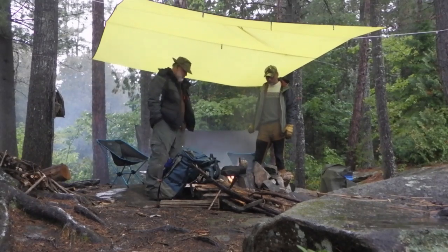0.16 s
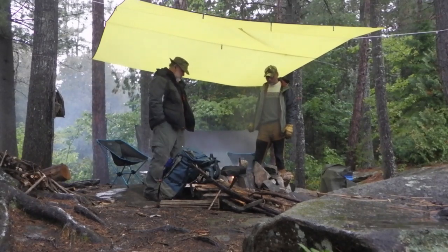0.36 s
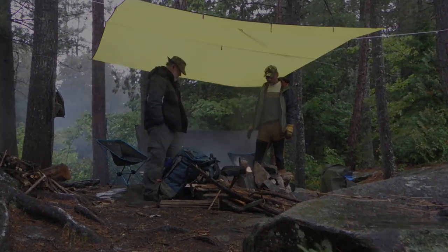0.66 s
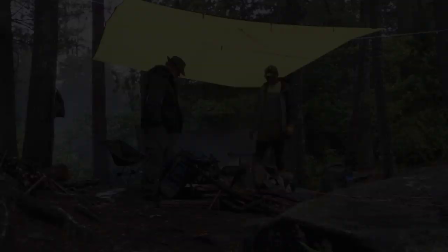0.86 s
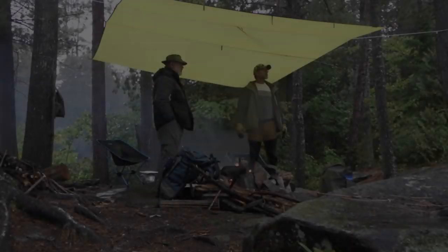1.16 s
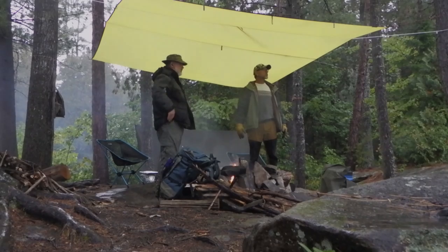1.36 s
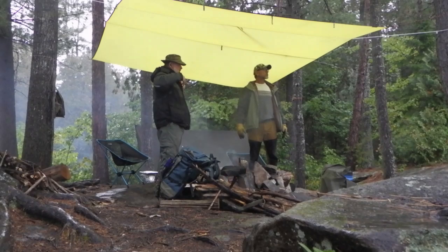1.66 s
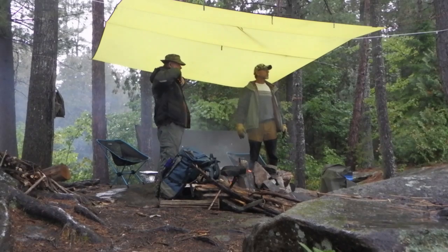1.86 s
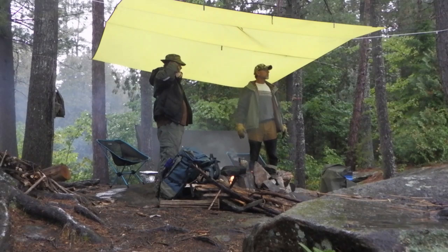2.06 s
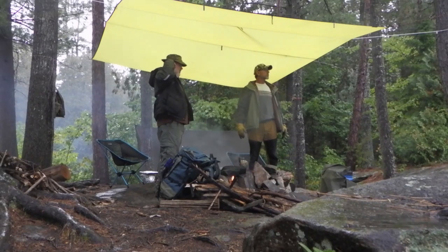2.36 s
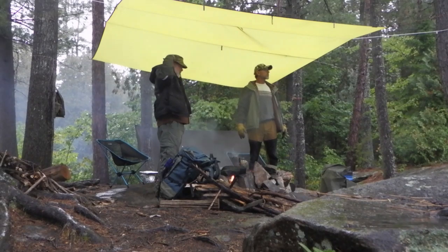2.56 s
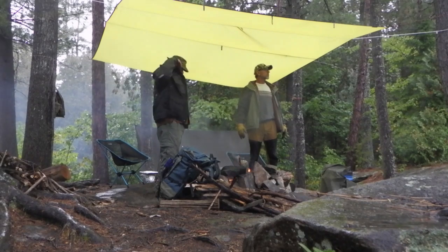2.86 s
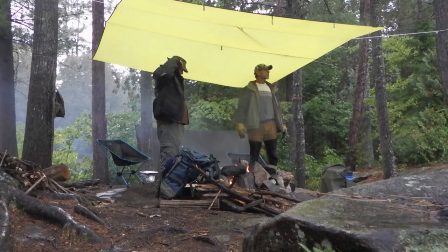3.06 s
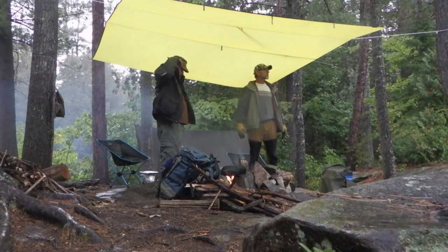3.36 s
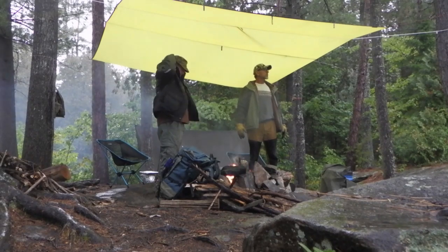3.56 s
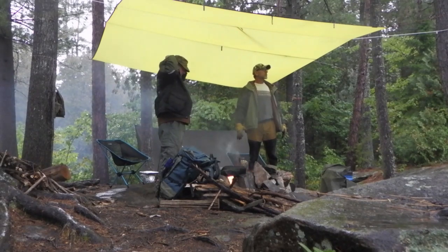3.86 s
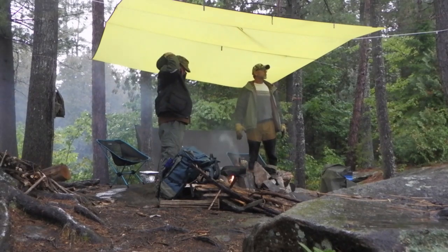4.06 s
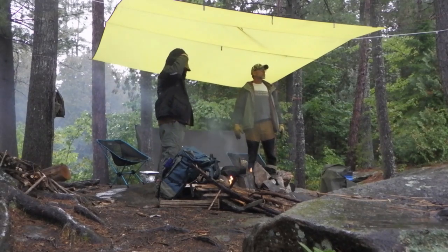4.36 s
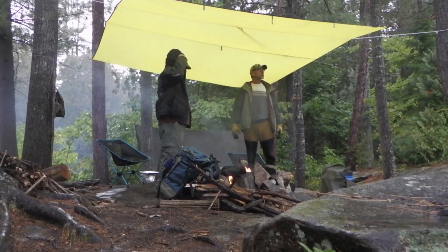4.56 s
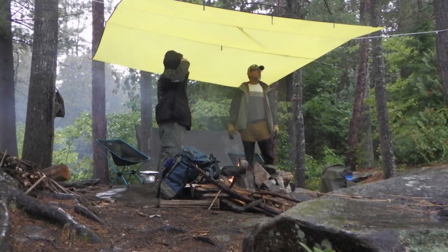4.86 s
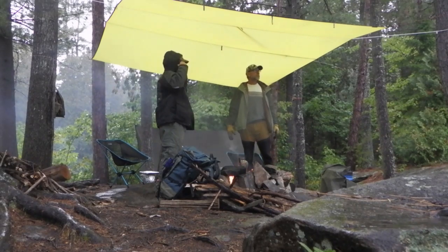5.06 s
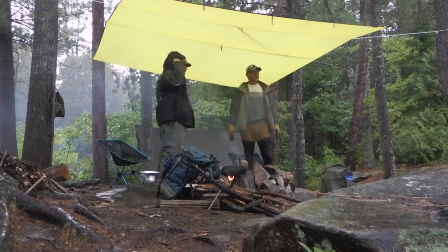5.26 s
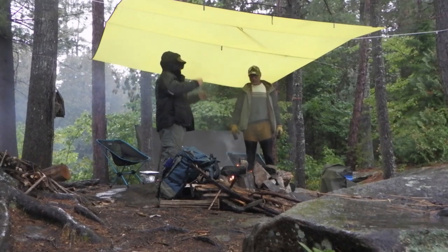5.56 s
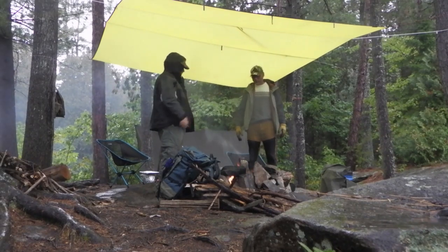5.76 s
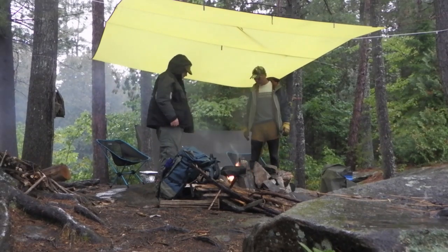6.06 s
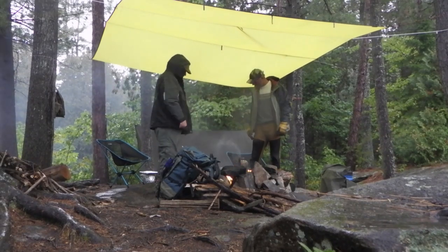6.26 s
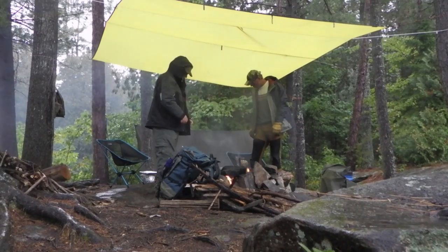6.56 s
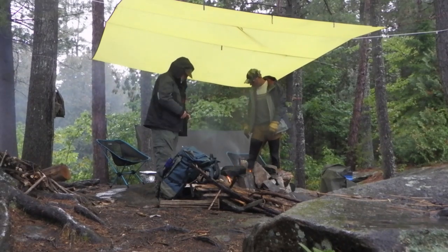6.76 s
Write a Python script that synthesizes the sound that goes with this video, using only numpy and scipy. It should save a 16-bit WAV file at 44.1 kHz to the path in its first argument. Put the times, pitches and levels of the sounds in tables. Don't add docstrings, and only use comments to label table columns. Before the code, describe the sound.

Outdoors at a forest camp, dense rain patter surrounds a small stereo microphone. Irregular drips rattle on tarp, stone, leaves and earth, each very short and dry. A loud fire pop arrives just before the early fade to silence; after the return, more snaps follow, some hard to the left or right. Loud cracks distort slightly and momentarily push the rain down. A faint low breeze is heard only at the start.

```python
import sys
import numpy as np
from scipy import signal
from scipy.fft import rfft, irfft
from scipy.io import wavfile
from scipy.ndimage import uniform_filter1d

SR = 44100
rng = np.random.default_rng(int(sys.argv[2]) if len(sys.argv) > 2 else 0)


def attenuation_scalar(level_db):
    decades = np.asarray(level_db, float) / 20
    return 10 ** decades


def dump(signal):
    limited = np.clip(np.atleast_2d(signal).T, -1, 1)
    pcm = np.round(limited * 32767).astype(np.int16)
    wavfile.write(sys.argv[1], SR, pcm)


N = 304510

# pitch_hz, level_db
IMPACT_TONE = [(1200, -60), (2000, -13), (3300, -8.5), (3900, -0.5), (4400, 4), (4950, -4), (5900, -4),
               (9000, -18.5), (12000, -50)]
LEAF_DB = (-23.5, -30.5)
FADE_S = 1.008


def level(x, db):
    return x * attenuation_scalar(db) / np.sqrt(np.mean(x ** 2))


def unit(x):
    return x / np.abs(x).max(axis=-1, keepdims=True)


def colour(x, points, size=2048):
    hz, db = np.transpose(points)
    bins_hz = np.fft.rfftfreq(size, 1 / SR)
    log_gain = np.log(attenuation_scalar(np.interp(np.log(bins_hz + 1), np.log(hz), db)))
    cepstrum = irfft(log_gain)
    cepstrum[1:size // 2] *= 2
    cepstrum[size // 2 + 1:] = 0
    taps = irfft(np.exp(rfft(cepstrum)))
    taps = taps.reshape((1,) * (x.ndim - 1) + (-1,))
    return signal.oaconvolve(x, taps, axes=-1)[..., :x.shape[-1]]


def band(x, lo_hz, hi_hz):
    sos = signal.butter(2, [lo_hz, min(hi_hz, .45 * SR)], "band", fs=SR, output="sos")
    return signal.sosfilt(sos, x)


def walk(rate):
    hold = int(SR / rate)
    steps = np.repeat(rng.standard_normal(N // hold + 1), hold)
    return 0.7 * uniform_filter1d(uniform_filter1d(steps, hold), hold)[:N]


def stereo(mid, side, pan_db):
    # pitch_hz, side_minus_mid_db
    width = [(60, -7), (110, -19), (200, -26), (380, -23.5), (700, -16), (1290, -11.5), (2380, -6),
             (4400, -3), (8120, 0), (15000, -0.5)]
    side = colour(side, width)
    return np.array([(mid + side) * attenuation_scalar(pan_db / 2), (mid - side) * attenuation_scalar(-pan_db / 2)])


def add(out, s, sounds):
    for start_s, sound in zip(s, sounds.transpose(1, 0, 2)):
        i = max(int(start_s * SR), 0)
        out[:, i:i + sound.shape[1]] += sound[:, :N - i]
    return out


def patter(rate, scatter_db, decay_ms, lo_hz, hi_hz):
    sizes = np.minimum(rng.exponential(size=N), 2.2)
    hits = (rng.random(N) < rate / SR) * attenuation_scalar(scatter_db * sizes)
    envelope = signal.lfilter([1], [1, -np.exp(-1000 / (decay_ms * SR))], hits)
    bursts = band(envelope * rng.standard_normal((2, N)), lo_hz, hi_hz)
    return level(bursts, 0) * np.sqrt(hi_hz - lo_hz)


def rain():
    # pitch_hz, density_db_per_hz
    port = [(40, -48.5), (176, -16), (412, -11), (1500, -7), (2100, -9), (3300, -8.5), (3850, -5.5),
            (4200, -2.5), (4520, -2), (5000, -10.5), (5900, -6.5), (9000, -21.5), (11500, -32),
            (13400, -32)]
    # start_s, level_db
    rain_level = [(0, 1.5), (.7, 2.5), (1.0, 6), (1.03, -1), (1.7, 0), (2.3, -0.5), (3.0, -1), (3.8, -1),
                  (4.1, 1.5), (4.4, -1), (5.1, 1.5), (5.7, -2.5), (6.0, 0.5), (6.9, -1.5)]
    hiss = rng.standard_normal((2, N)) * attenuation_scalar(0.47 * walk(12)) * np.sqrt(SR / 2)
    tarp = patter(200, 4.4, 3.0, 220, 8600)
    soil = patter(120, 6.4, 13.4, 190, 2320)
    leaves = patter(300, 7.4, 0.53, 2400, 5200)
    stone = patter(300, 4.0, 1.0, 4700, 15000)
    mix = attenuation_scalar(-0.5) * hiss + attenuation_scalar(-4.0) * tarp + attenuation_scalar(-8.5) * soil + attenuation_scalar(-0.5) * leaves + attenuation_scalar(-1.5) * stone
    mid, side = colour(mix, port)
    s, db = np.transpose(rain_level)
    return level(stereo(mid, side, -2.44), -27.5) * attenuation_scalar(np.interp(np.arange(N) / SR, s, db))


def breeze():
    # start_s, level_db
    gusts = [(0, -50.5), (.6, -45.5), (.72, -45), (1.0, -49), (1.05, -81), (3.0, -67), (6.9, -71)]
    rumble = band(band(rng.standard_normal((2, N)), 55, 260), 55, 260)
    eddies = rumble * attenuation_scalar(8 * np.array([walk(42), walk(18)]))
    s, db = np.transpose(gusts)
    return level(eddies, 0) * attenuation_scalar(np.interp(np.arange(N) / SR, s, db))


def strays(count=36):
    s = rng.random(count) * N / SR
    size, place = rng.standard_normal((count, 2)).T
    gain_db = 20 * np.log10(gain()[(s * SR).astype(int)])
    peak_db = -17.5 + 1 * size + gain_db
    pan_db = -3 + 3 * place
    return [(a, b, *LEAF_DB, c) for a, b, c in zip(s, peak_db, pan_db)]


def drop_rows():
    # start_s, peak_db, low_body_db, left_minus_right_db
    tarp_slaps = [(0.0372, -7.5, -27, 1), (0.2705, -3.5, -29, -3.0), (0.3436, -18, -29, -6),
                  (0.4398, -10, -30, -7), (1.4877, -15.5, -23, -8), (1.7541, -12, -21, -2),
                  (1.799, -13, -23, -5.0), (1.9899, -4.5, -22, -3.5), (2.1867, -9.5, -23, -5),
                  (2.2208, -10.5, -23, -4.5), (2.227, -8.5, -19, -3), (2.2543, -8, -25, -3.5),
                  (2.5549, -15, -21, -9), (2.8992, -9, -21.5, -3), (3.0684, -8.5, -37, 6),
                  (3.2306, -8, -22, -2.5), (3.2595, -10, -25, -3), (3.4117, -4, -24, -1),
                  (3.4417, -6.5, -20.5, -1), (3.537, -11.5, -20, -7), (3.6237, -12.5, -21, 6),
                  (4.117, -11, -29, -5), (4.5253, -7.5, -16.5, -1), (4.7587, -11.5, -34, -6),
                  (5.0744, -12, -28.5, -3.0), (5.677, -5, -26, -2), (5.893, -4.5, -31, -3),
                  (6.162, -8.5, -27, -2), (6.791, -10, -18, -3), (6.8359, -6, -26, -1)]
    # start_s, peak_db, left_minus_right_db
    soil_thuds = [(0.097, -25, -4.0), (1.046, -41, -2.5), (1.0969, -35, -3.5), (1.3081, -19.5, -1),
                  (2.1164, -13, -3.0), (2.3077, -12, -2), (2.3856, -11.5, -1), (2.6721, -17.5, -1),
                  (2.8769, -17, -2), (3.211, -17.5, 6), (3.6456, -12.5, -3.5), (3.8402, -15.5, -2),
                  (3.9701, -20.5, -1), (4.0484, -18.5, -3.0), (4.218, -17.5, -3), (4.5956, -13.5, -3.5),
                  (4.8165, -13, 3), (4.8293, -23.5, -20), (4.8823, -20.5, -3.5), (5.1424, -18, -2),
                  (5.2114, -16.5, 1), (5.252, -16.5, -2), (5.443, -13, -5), (5.469, -19.5, -11),
                  (5.5045, -23, -9), (5.7445, -12.5, -2), (5.769, -18, -0.5), (6.032, -14.5, 4),
                  (6.4348, -11, 0), (6.6046, -9.5, -1)]
    splashes = [(0.1835, -14.5, -8), (0.584, -13.5, 4), (0.6905, -15, 4), (1.2113, -26, -3.5),
                (1.2434, -18, 1), (1.6884, -15.5, -3.0), (1.7705, -9, -1), (1.9657, -21, -6),
                (2.4603, -14, -8), (2.7203, -19, -4), (3.7835, -21, -3.0), (3.9429, -20, -3.5),
                (3.9905, -17.5, -4.5), (4.2827, -12, -4.0), (5.5987, -13, 0), (5.8318, -11.5, -3),
                (6.4907, -10.5, -5), (6.867, -9, -8), (2.6345, -10, -4), (4.175, -17, -3), (5.8, -17, -5),
                (3.1, -17, -8), (1.0, -44.5, -4), (.775, -38, -1)]
    sharp_ticks = [(0.0924, -12.5, -4.0), (0.2252, -8.5, -4), (0.385, -12, -2.5), (0.5966, -11, -2),
                   (0.903, -38.5, -2.5), (1.442, -18, -3.5), (1.5224, -13, -2.0), (1.8456, -12, -7),
                   (2.341, -11, -3.5), (2.6644, -17, 0), (3.4971, -19, -7), (3.8965, -13.5, 0),
                   (4.1838, -14, -2.5), (4.4714, -15, -7), (4.5413, -9, -7), (4.5506, -14, 0),
                   (4.7285, -17, -2.0), (4.7477, -13, -4), (5.1864, -20.5, -8), (5.2957, -14, -1.5),
                   (5.3238, -15, -4.5), (5.3482, -14, -3.0), (5.4303, -23, -7), (5.7867, -14, -3.5),
                   (5.9509, -11.5, 0), (6.0974, -15, -4.0), (6.181, -10.5, -3.5), (6.34, -11, 0),
                   (6.5748, -9, -5), (6.71, -15, -2.5)]
    more_ticks = [(0.468, -12, -2), (0.5425, -19, -3.5), (0.6382, -18, -1.0), (1.1667, -29, -2.5),
                  (1.428, -18.5, -3.0), (1.6116, -15.5, -3.0), (1.693, -20, -3.0), (1.7345, -18, -5),
                  (1.8786, -17, -3.5), (2.4164, -13.5, -6), (2.843, -14, -1), (3.0545, -15, -2),
                  (3.609, -15, -3), (3.7184, -27, -3.0), (4.3162, -15, -2.0), (4.3328, -16.5, -5),
                  (4.3606, -19, -3.0), (4.442, -18, -3.5), (4.4996, -13.5, -3.5), (4.9671, -18.5, -4.0),
                  (4.999, -24, -5), (5.0612, -19, 0.5), (5.066, -17, -1), (5.1173, -16.5, -3.0),
                  (5.229, -18, -6), (6.2851, -16, -3.5), (6.327, -16, -2.0), (6.6261, -12, -2.0),
                  (6.7521, -17, -7), (6.8954, -14, -5)]
    tarp_snap_db, soil_db, stone_db = -20, (-17, -38), (-29.5, -14.5)
    rows = [(s, db, low_db, tarp_snap_db, pan_db) for s, db, low_db, pan_db in tarp_slaps]
    surfaces = [(soil_thuds, soil_db), (splashes, stone_db), (sharp_ticks, LEAF_DB), (more_ticks, LEAF_DB)]
    for table, surface in surfaces:
        rows += [(s, db, *surface, pan_db) for s, db, pan_db in table]
    return np.array(rows + strays())


def drops(size=1024):
    s, peak_db, low_db, high_db, pan_db = drop_rows().T[:, :, None]
    t_ms = np.arange(size) * 1000 / SR
    chance = rng.standard_normal((len(s), 5, size)).transpose(1, 0, 2)
    splinters = chance[:2] * attenuation_scalar(3.0 * chance[2:4])
    decay_ms = 0.62 * attenuation_scalar(0.68 * chance[4, :, :1])
    attack = np.minimum(t_ms / 0.14, 1)
    burst = splinters * attack * (np.exp(-t_ms / decay_ms) + 0.21 * np.exp(-t_ms / 6.8))
    tick = unit(colour(burst, IMPACT_TONE))
    body = unit(band(band(burst, 250, 2090), 250, 2090)) * attenuation_scalar(low_db + 8.0)
    snap_db = high_db + 2.5 * chance[4, :, 1:2]
    snap = unit(band(band(burst, 4900, 15000), 6200, 11000)) * attenuation_scalar(snap_db)
    mid, side = tick + body + snap
    heard = stereo(mid, attenuation_scalar(-3.5) * side, pan_db) * attenuation_scalar(peak_db - 2.0)
    return add(np.zeros((2, N)), s[:, 0] + .0003, heard)


def knocks(size=1024):
    # start_s, peak_db, pitch_hz, left_minus_right_db
    knock_table = [(0.073, -25, 130, -24), (0.1035, -19, 283, -29), (0.223, -29, 190, 19),
                   (0.2772, -7, 1240, -17), (0.552, -27, 238, -27), (.7166, -42, 70, -13),
                   (.7168, -26, 558.3, -8), (3.6836, -40.5, 70, 18), (3.684, -21.5, 500, 20),
                   (4.864, -40, 71, -23), (4.8651, -4, 990, -25), (5.5081, -18, 1300, -4),
                   (6.0367, -24.5, 220, 30)]
    s, peak_db, hz, pan_db = np.array(knock_table).T[:, :, None]
    u = (np.pi * hz * (np.arange(size) - size / 2) / SR) ** 2
    push = (1 - 2 * u) * np.exp(-u) * attenuation_scalar(peak_db)
    ports = attenuation_scalar(np.minimum([pan_db, -pan_db], 0))
    return add(np.zeros((2, N)), s[:, 0] - size / 2 / SR, push * ports)


def pops(size=512):
    # start_s, left_peak_db, right_peak_db, crack_hz, crack_db
    pop_table = [(.7158, 13, 2, 2660, -5), (1.8376, 2, -4, 4200, 8), (2.6024, -2.5, -3, 4130, -4),
                 (2.6564, 8.5, 9, 2640, -6.5), (2.8325, -25, -4.5, 8300, 12),
                 (3.6829, 10.5, -10, 2920, -9.5), (3.9141, 2.5, -8.5, 3370, -2.5),
                 (4.7120, 5.5, -25, 5730, 9), (4.8643, -1, 14, 4730, -15), (4.9451, -4.5, -13, 3250, 6.5),
                 (5.1646, -29, -8, 6800, -12), (5.1734, -5, -9, 4100, -2)]
    s, left_db, right_db, hz, crack_db = np.array(pop_table).T[:, :, None]
    t = np.arange(size) / SR
    length_s = 0.00015 * attenuation_scalar(0.31 * np.maximum(left_db, right_db))
    noise = rng.standard_normal((len(s), 2, size)).transpose(1, 0, 2)
    spit = noise * np.exp(-t / (length_s + .00005))
    crack = np.sin(2 * np.pi * hz * t) * np.exp(-hz * t / 1.3)
    click = 2.16 * (t == 0)
    ring = unit(colour(spit + click, IMPACT_TONE)) + attenuation_scalar(crack_db) * band(band(crack, 1180, 14600), 1180, 14600)
    heard = unit(ring) + attenuation_scalar(-26) * unit(band(spit, 6700, 17000))
    return add(np.zeros((2, N)), s[:, 0], heard * attenuation_scalar([left_db, right_db]))


def fade():
    return np.clip(np.abs(np.arange(N) / SR - FADE_S) / FADE_S, 0.0018, 1)


def ducking():
    # start_s, depth_db
    duck_table = [
        (0.72, 19),
        (1.839, 3.5),
        (2.661, 8.5),
        (3.685, 9),
        (3.917, 3.5),
        (4.718, 5.5),
        (4.869, 9),
        (4.947, -0.6),
    ]
    recover_db_per_s = 12.5
    t = np.arange(N) / SR
    cut_db = np.zeros(N)
    for s, depth_db in duck_table:
        i = int(s * SR)
        recovering_db = cut_db[i] + depth_db - recover_db_per_s * (t[i:] - s)
        same_side = (s > FADE_S) | (t[i:] < FADE_S)
        cut_db[i:] = np.maximum(recovering_db, 0) * same_side
    return attenuation_scalar(-uniform_filter1d(cut_db, size=64))


def gain():
    return ducking() * fade()


def scene():
    drips = drops() / gain()
    near = (pops() + knocks()) / gain()
    woods = band(drips.mean(axis=0), 480, 5600)
    tail = rng.standard_normal((2, 4096)) * np.exp(-np.arange(4096) / SR / 0.017)
    echo = signal.oaconvolve(woods[None], tail, axes=-1)[:, :N]
    return rain() + breeze() + near + drips + attenuation_scalar(-36.0) * echo


def low_pass(x):
    return signal.sosfilt(signal.butter(12, 16390, fs=SR, output="sos"), x)


def record(dry):
    overload = .98
    top = signal.sosfilt(signal.butter(8, 14400, fs=SR, output="sos"), dry) * ducking()
    shaved = top - np.clip(top, -overload, overload)
    no_thump = signal.butter(2, 350, "high", fs=SR, output="sos")
    clipped = top - signal.sosfiltfilt(no_thump, shaved)
    smooth = signal.sosfilt(signal.butter(8, 16300, fs=SR, output="sos"), clipped)
    return low_pass(smooth * fade())


dry = scene()
out = record(dry)
dump(out)
```